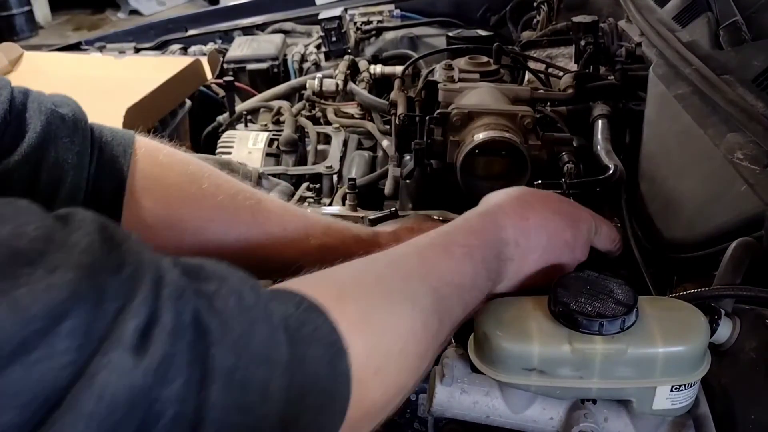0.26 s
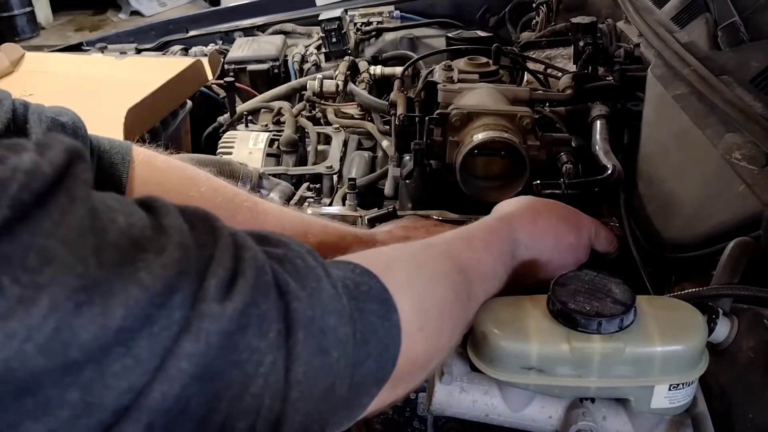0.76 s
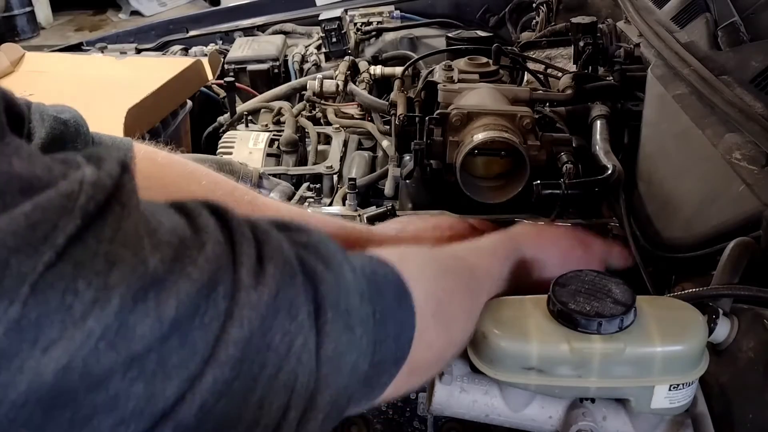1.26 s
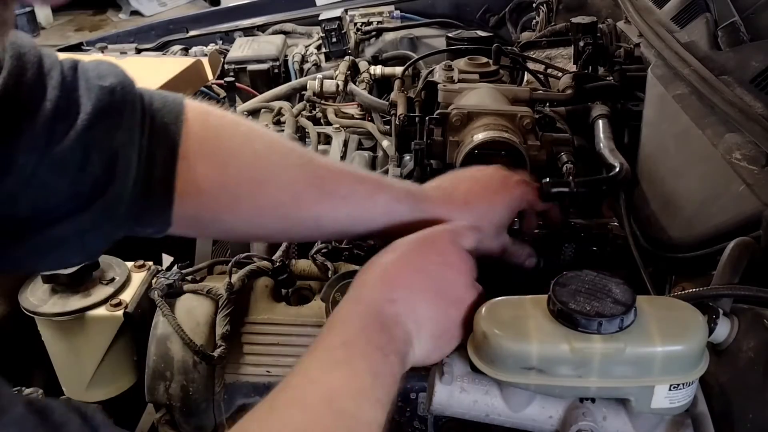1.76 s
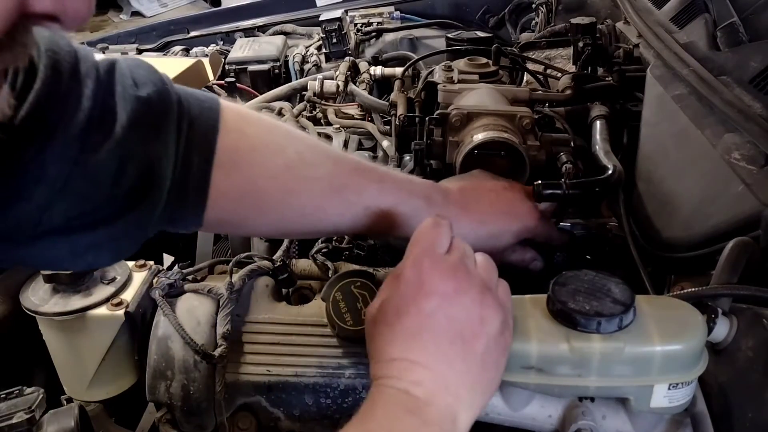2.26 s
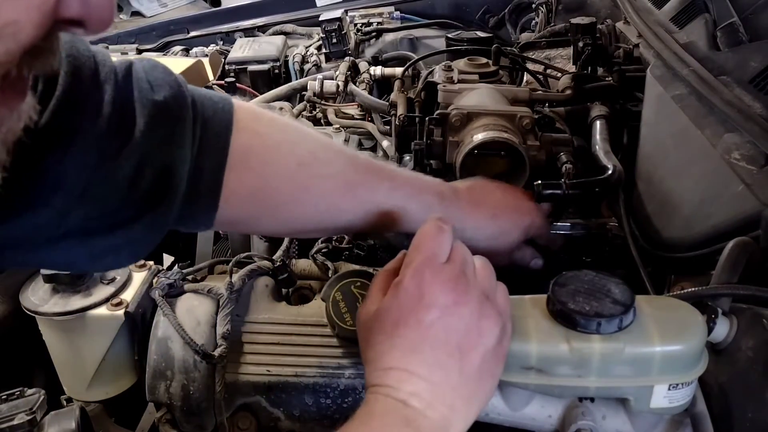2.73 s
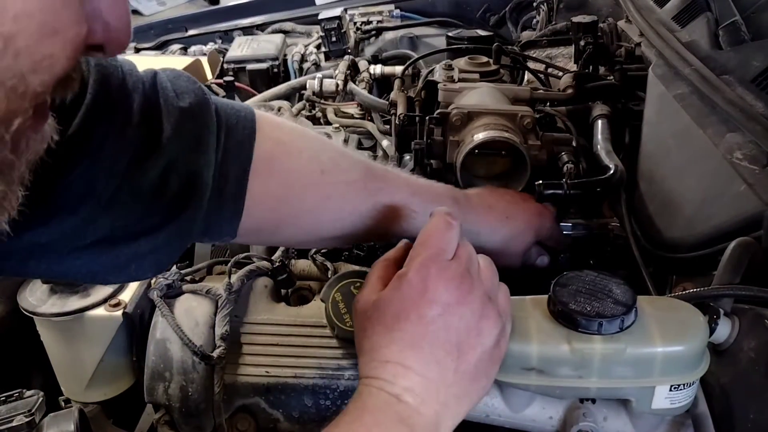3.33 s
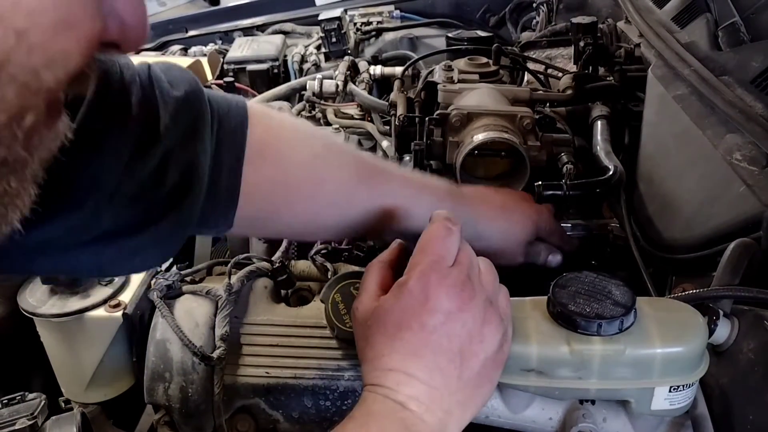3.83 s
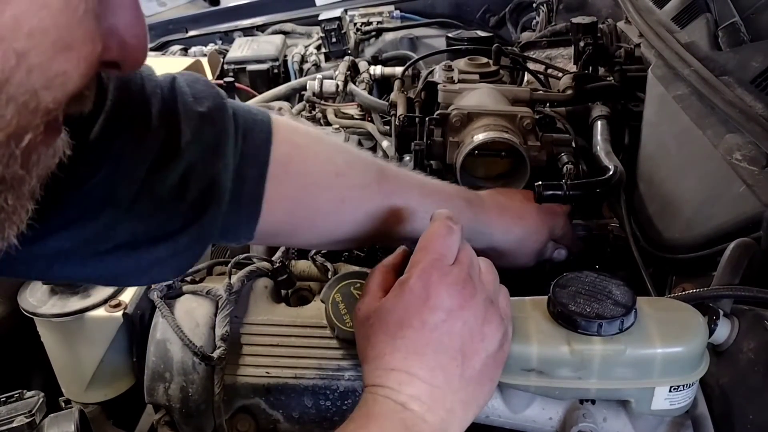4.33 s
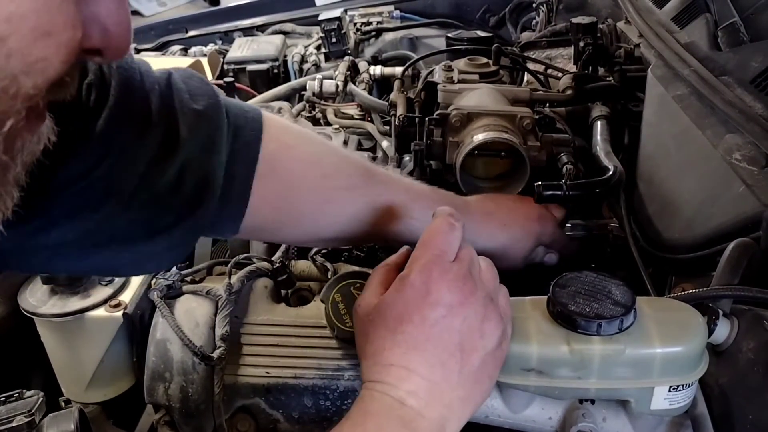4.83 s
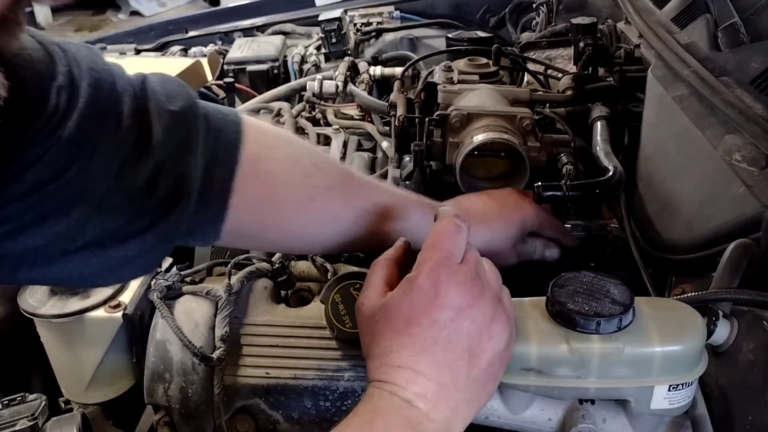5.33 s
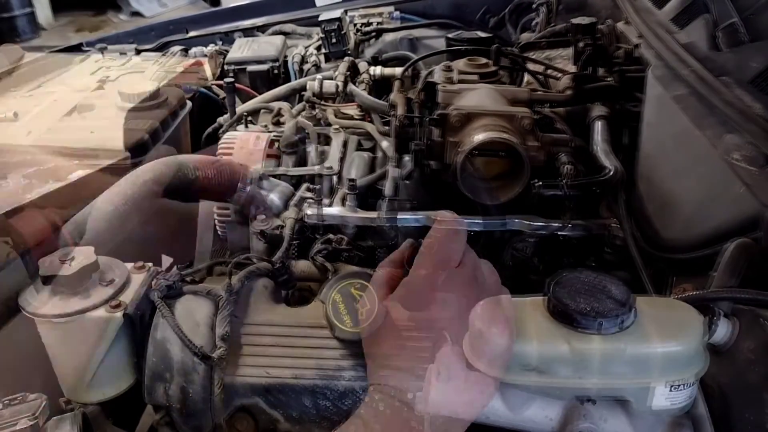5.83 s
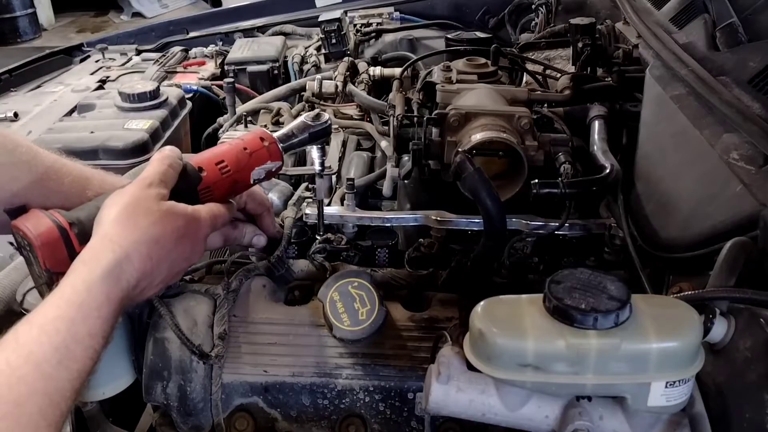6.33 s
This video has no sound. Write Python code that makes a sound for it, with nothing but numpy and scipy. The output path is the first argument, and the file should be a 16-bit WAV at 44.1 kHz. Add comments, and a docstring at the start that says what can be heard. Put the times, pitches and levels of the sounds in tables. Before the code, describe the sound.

Hollow knocks, dry clunks and small steel ticks of a socket being fitted in an engine bay, then a cordless ratchet chattering loudly close by.

```python
"""In a garage, under the bonnet of a car, a socket on a long extension is wiggled onto a bolt.
Noise bursts and damped modes make hollow knocks, dry clunks and steel ticks; filtered noise makes
squeaks, rubbing and a sliding hiss. Then a cordless ratchet runs close by: each stroke drags the pawl
over the teeth and snaps back, starting fast, sagging, surging as the load lets go, then slowing down.
The engine bay and the garage answer; a vehicle, a wavering sine, drones far away outside."""
import sys
import numpy as np
from scipy import signal
from scipy.fft import rfft, irfft, next_fast_len
from scipy.io import wavfile
from scipy.ndimage import uniform_filter1d

SR = 44100
rng = np.random.default_rng(int(sys.argv[2]) if len(sys.argv) > 2 else 0)


def master(y):
    """Save y as 16-bit WAV."""
    cut = np.clip(np.atleast_2d(y).T, -1, 1)
    pcm = np.round(cut * 32767)  # scale
    wavfile.write(sys.argv[1], SR, pcm.astype(np.int16))


N = 290178
TIME = np.arange(N) / SR  # seconds


def undb(db):
    """Decibels to gain."""
    return 10 ** (np.asarray(db) / 20)


def unit(x):
    """Scale to an rms of one."""
    return x / np.sqrt(np.mean(x ** 2))


def curve(rows, axis=1):
    """One column of a table, joined by straight lines in time."""
    rows = np.array(rows)
    return np.interp(TIME, rows[:, 0], rows[:, axis])


def fade(t60, size):
    """Exponential decay by 60 dB in t60 seconds."""
    return np.exp(-np.log(1000) * TIME[:size] / t60)


def swell(s, length_s):
    """A smooth rise and fall around one moment; length_s runs from the peak to 1/e."""
    return np.exp(-((TIME - s) / length_s) ** 2)


def wander(size):
    """Smooth chance that changes over some samples; spread of one."""
    once = uniform_filter1d(rng.standard_normal(N), size)
    return unit(uniform_filter1d(once, size))


def through(x, response):
    """Pass a sound through an impulse response."""
    return signal.fftconvolve(x, response)[:len(x)]


def band(x, lo, hi, order=3):
    """Band-pass filter; its upper edge stays below 0.45 of the sample rate."""
    sos = signal.butter(order, [lo, min(hi, SR * .45)], "band", fs=SR, output="sos")
    return signal.sosfilt(sos, x)


def colour(x, points, tilt_db=0, size=2048):
    """Causal minimum-phase filter with a (Hz, dB) spectrum, tilted by some dB per octave."""
    hz, db = np.transpose(points)
    octave = np.log2(np.maximum(np.fft.rfftfreq(size, 1 / SR), 1))
    tilted_db = db + tilt_db * np.log2(hz / hz[0])
    gain = undb(np.interp(octave, np.log2(hz), tilted_db))
    # folding the cepstrum makes the response start at once
    cepstrum = irfft(np.log(gain))
    cepstrum[1:size // 2] *= 2
    cepstrum[size // 2 + 1:] = 0
    return through(x, irfft(np.exp(rfft(cepstrum))))


def ring(modes, tilt_db=0, scatter_db=1, detune=0.02, size=16384):
    """Sum of damped modes; their balance and tuning change a little with the spot that is struck."""
    total = np.zeros(size)
    for hz, db, t60 in modes:
        gain = undb(db + tilt_db * np.log2(hz) + scatter_db * rng.standard_normal())
        pitch = hz * (1 + detune * rng.standard_normal())
        total += gain * fade(t60, size) * np.sin(2 * np.pi * pitch * TIME[:size])
    return total


def resonate(x, hz, t60):
    """Drive one mode with a force; the result has an rms of one."""
    r = np.exp(-np.log(1000) / (t60 * SR))
    return unit(signal.lfilter([1, 0, -1], [1, -2 * r * np.cos(2 * np.pi * hz / SR), r * r], x))


def burst(t60, size=16384):
    """Noise that dies away, of unit energy."""
    x = rng.standard_normal(size) * fade(t60, size)
    return x / np.linalg.norm(x)


# Stereo width. Each row: frequency in Hz, side level minus mid level in dB.
STEREO_WIDTH = [(60, -10.5), (380, -11), (560, -6), (760, -0.5), (1200, 1), (2400, -0.5), (4400, 1),
                (8100, 2), (15000, 3)]


def stereo(mid, side):
    """Left and right are more alike in the bass and mostly unrelated in the treble."""
    side = colour(side, STEREO_WIDTH)
    return np.array([mid + side, mid - side])


def hiss(points):
    """Stereo noise with a (Hz, dB) spectrum."""
    return stereo(*(unit(colour(x, points, size=8192)) for x in rng.standard_normal((2, N))))


def add(out, s, x, db, size=128, bay_t60=0.022):
    """Mix in an event at its peak level; reflections among the engine parts set the channels apart."""
    start = max(int(s * SR), 0)
    # the peak is the loudest short-term rms over size samples
    x = x * undb(db) / np.sqrt(uniform_filter1d(x ** 2, size).max())
    reflections = through(x, burst(bay_t60))
    out[:, start:start + len(x)] += stereo(x, reflections)[:, :N - start]


# Far vehicle. Each row: time in seconds, mean firing rate in Hz, mean level in dB.
VEHICLE_DRONE = [(0, 79.3, -86), (1.5, 66, -76), (2.1, 65.5, -65), (2.6, 68.5, -67), (3.0, 72.5, -64.5),
                 (3.5, 72.6, -56.5), (3.7, 72.2, -80), (4.0, 80.1, -84), (4.2, 95.1, -69), (5, 95, -70.5),
                 (5.6, 98.8, -67), (6.58, 99, -61.5)]
# Spectrum of the garage air. Each row: frequency in Hz, level in dB.
AIR_SPECTRUM = [(15, -33.5), (25, -33), (58, -20), (70, -9.5), (96, -8.5), (177, -8.5), (197, -12.5),
                (309, -16), (392, -46), (616, -34), (916, -31), (14000, -43)]


def background(air_db=-70, pitch_wander=0.038, waver_db=1.5):
    """Still garage air as steady noise; a far vehicle's exhaust note as a sine of wavering pitch and level."""
    # the pitch wander is a share of the firing rate
    firing_hz = curve(VEHICLE_DRONE) * (1 + pitch_wander * wander(size=8000))
    turns = np.cumsum(firing_hz) / SR
    note = np.sqrt(2) * np.sin(2 * np.pi * turns)
    drone = note * undb(curve(VEHICLE_DRONE, axis=2)) * undb(waver_db * wander(size=4000))
    return drone + hiss(AIR_SPECTRUM) * undb(air_db)


# Drags of an arm or sleeve. Each row: loudest moment in seconds, level in dB, peak to 1/e in seconds.
ARM_DRAGS = [(0.806, -66.5, 0.43), (2.094, -63.5, 0.62), (3.666, -61, 0.35)]
# Spectrum of skin and cloth. Each row: frequency in Hz, level in dB.
RUSTLE_SPECTRUM = [(25, -39), (70, 10.5), (150, -1.5), (300, -1), (560, 2), (900, -8.5), (1600, -18),
                   (3000, -25.5), (6000, -29), (15000, -43)]


def rubbing(rest_db=-74.5, grip_db=3.0):
    """Skin and cloth drag unevenly over the parts: noise swells above hands that only shift their grip."""
    drags = sum((undb(db) * swell(s, length_s)) ** 2 for s, db, length_s in ARM_DRAGS)
    power = undb(rest_db) ** 2 + drags
    return hiss(RUSTLE_SPECTRUM) * np.sqrt(power) * undb(grip_db * wander(size=900))


# Squeaks on the bolt head. Each row: loudest moment in seconds, peak in dB, peak to 1/e in seconds.
BOLT_SQUEAKS = [(1.433, -70, 0.033), (1.719, -55, 0.0072), (1.734, -53.5, 0.007), (1.76, -72.5, 0.13),
                (2.155, -78, .014), (2.22, -66.5, .016), (2.27, -76.5, .13), (2.359, -72, 0.0096),
                (2.765, -78, .008)]
# Broad scrapes of sliding parts. Each row: loudest moment in seconds, peak in dB,
# peak to 1/e in seconds, centre in Hz.
PART_SCRAPES = [(0.284, -78, .014, 12500), (1.371, -63, 0.01, 7200), (1.552, -72.5, 0.14, 9700),
                (1.727, -70.5, 0.029, 8800), (2.799, -64, 0.0076, 7000), (3.451, -57, 0.014, 4380),
                (3.571, -67.5, 0.074, 4780), (5.457, -73, 0.029, 10670)]
SQUEAK_HZ, SQUEAK_WIDTH_HZ = 5610, 260
SCRAPE_WIDTH = 1  # share of the centre frequency


def squeaks(size=16384):
    """Squeaks share one narrow resonance, scrapes fill a broad band; both are swells of filtered noise."""
    out = np.zeros((2, N))
    middle = size / 2 / SR
    narrow = [(s, db, length_s, SQUEAK_HZ, SQUEAK_WIDTH_HZ) for s, db, length_s in BOLT_SQUEAKS]
    broad = [(s, db, length_s, hz, hz * SCRAPE_WIDTH) for s, db, length_s, hz in PART_SCRAPES]
    for s, db, length_s, hz, width_hz in narrow + broad:
        slide = rng.standard_normal(size) * swell(middle, length_s)[:size]
        add(out, s - middle, band(slide, hz - width_hz / 2, hz + width_hz / 2, order=2), db)
    return out


# Steel touching steel. Each row: start in seconds, reference level in dB, tilt in dB per octave,
# ring in Hz, ring relative to the reference in dB.
STEEL_TICKS = [(0.319, -62.5, -4, 2150, -6), (0.425, -53.5, -3.5, 2260, -9), (1.333, -52, 1.5, 8640, -12),
               (1.346, -47, 3, 6300, -8), (1.554, -31, -7, 2930, -8.5), (2.808, -43, -1, 6500, -9),
               (2.831, -42, 4, 8400, -5), (2.921, -47, 0.5, 1630, 2.5), (2.923, -49, -2, 3230, -2),
               (2.673, -69, -1, 6000, -11), (3.446, -37, -13.5, 5500, -9), (3.805, -67, 4, 5270, -4),
               (3.910, -58.5, 3.5, 4060, -1), (4.537, -69, 1.5, 4560, -13), (4.547, -70, -4, 2400, -5),
               (4.798, -75, -1, 2834, -2), (4.694, -65.5, 4.5, 4120, -11), (5.022, -68.5, 0, 2800, -4),
               (5.367, -65, 2, 5600, -5.5)]
# Spectrum of a tick before its tilt. Each row: frequency in Hz, level in dB.
TICK_SPECTRUM = [(500, -50), (1500, 1), (2600, -6), (3500, -8), (5000, -11.5), (7000, -16.5), (8700, -12),
                 (11000, -18.5), (16000, -25)]
# after each touch the loose socket rattles in a dense run of tiny bounces
RATTLE_DB, RATTLE_T60_S, RATTLE_GRAIN_DB = -12, 0.15, 1
# fingers fidget with the parts all the while
FIDGET_PER_S, FIDGET_DB, FIDGET_SPREAD_DB = 1.6, -78, 2


def ticks(t60=0.03, level_db=-2, ring_t60=0.0072, size=16384):
    """Bright contacts of socket, extension and bolt: noise, brief ring and rattle; faint ones at random."""
    out = np.zeros((2, N))
    for s, db, tilt_db, hz, ring_db in STEEL_TICKS:
        add(out, s, colour(burst(t60), TICK_SPECTRUM, tilt_db), db + level_db)
        add(out, s, resonate(burst(t60), hz, ring_t60), db + ring_db)
        rattle = burst(RATTLE_T60_S) * undb(RATTLE_GRAIN_DB * wander(size=60)[:size])
        add(out, s, colour(rattle, TICK_SPECTRUM, tilt_db), db + RATTLE_DB)
    # one fidget at a random moment of each equal slot
    for slot in np.arange(0, TIME[-1], 1 / FIDGET_PER_S)[:-1]:
        s = slot + rng.random() / FIDGET_PER_S
        db = FIDGET_DB + FIDGET_SPREAD_DB * rng.standard_normal()
        add(out, s, colour(burst(t60), TICK_SPECTRUM), db)
    return out


# Resonances of the sliding extension. Each row: centre in Hz, width in Hz, relative level in dB.
SLIDE_BANDS = [(4650, 860, 10), (6300, 1400, -3), (9550, 770, -5)]


def sliding(from_s=0.375, to_s=0.85, edge_s=0.055, level_db=-80):
    """A soft, steady hiss in a few resonances while the steel extension runs through the fingers."""
    contact = np.clip(np.minimum(TIME - from_s, to_s - TIME) / edge_s, 0, 1)
    friction = rng.standard_normal((2, N))
    rings = 0
    for hz, width_hz, db in SLIDE_BANDS:
        rings = rings + undb(db) * unit(band(friction, hz - width_hz / 2, hz + width_hz / 2, order=1))
    return stereo(*unit(rings)) * contact * undb(level_db)


# Modes of the stiff bracket. Each row: frequency in Hz, level in dB, t60 in seconds.
BRACKET_MODES = [(332, 5, 0.09), (477, -19, 0.05), (582, 8, 0.12), (765, -4.5, 0.096), (905, 0.5, 0.032),
                 (1005, -5, 0.028), (1330, 0, 0.014), (1485, -4, 0.018), (1570, -9, 0.064),
                 (2360, -13, 0.02)]
# Dry clunks. Each row: start in seconds, peak in dB, favoured pitch in Hz,
# fall in dB per octave away from it.
BRACKET_CLUNKS = [(0.422, -50.5, 1496, 7), (3.446, -34, 593, 11), (3.475, -33, 930, 31),
                  (4.692, -47, 1470, 10.5), (4.977, -54.5, 1497, 12)]
# Contact noise of clunks and knocks. Each row: frequency in Hz, level in dB.
CLACK_SPECTRUM = [(150, -18.5), (300, 10.5), (700, 10), (1050, 3.5), (1350, -4.5), (1650, -10.5),
                  (2400, -3.5), (3200, -22.5), (6000, -22), (16000, -48.5)]


def clunks(clack_db=-12, clack_t60=0.21):
    """The extension strikes a stiff bracket: contact noise and damped modes, strongest near one pitch."""
    out = np.zeros((2, N))
    for s, db, favoured_hz, fall_db in BRACKET_CLUNKS:
        # the spot that is struck favours the modes near one pitch
        modes = [(hz, mode_db - fall_db * abs(np.log2(hz / favoured_hz)), t60)
                 for hz, mode_db, t60 in BRACKET_MODES]
        add(out, s, band(ring(modes), 330, 1460, order=2), db, bay_t60=.012)
        add(out, s, colour(burst(clack_t60), CLACK_SPECTRUM), db + clack_db)
    return out


# Modes of the hollow cover before tilt and damping. Each row: frequency in Hz, level in dB, t60 in seconds.
COVER_MODES = [(299, -12, 0.14), (314.8, -10.5, 0.2), (350, -7, 0.055), (420, -13.5, 0.07), (452, -9, 0.06),
               (484.4, 3, 0.05), (529.7, 6.5, 0.068), (560, -1.5, 0.074), (546, -9, 0.023),
               (749, -15.5, 0.13), (930, -10.5, .025), (1131, -12.5, 0.044), (1600, -17, 0.028),
               (2080, -17.5, 0.018)]
# Knocks on it; the row at 2.022 s is a strong wall echo of the 1.986 s knock, played like a knock. # Each row:
# start in seconds, peak of the body in dB, tilt of the modes in dB per octave, # contact relative to that peak
# in dB (before the clack and tap trims), tap pitch in Hz.
COVER_KNOCKS = [(0.451, -54.5, -7, -9, 1240), (1.051, -55, 3, -24, 1110), (1.143, -60, 0, -20, 1050),
                (1.21, -63, 0, -27, 1034), (1.347, -47.5, -8, 2.5, 1040), (1.453, -25, 1.5, -14.5, 1180),
                (1.555, -31.5, -16.5, 2, 1370), (1.567, -29, -18.5, -4.5, 830),
                (1.755, -45.5, -3, -29, 1120), (1.986, -26.5, 1, -24, 1860), (2.022, -35, 0, -19, 1143),
                (2.180, -21, 4.5, -16.5, 1570), (2.591, -35.5, 2.5, -18.5, 1060),
                (2.663, -51.5, -13, -16, 2270), (2.793, -54, 6, 3, 1100), (2.802, -36, -7, -8.5, 805),
                (2.814, -35.5, -12, -8, 1140), (2.829, -39, 4, -22, 1160), (2.938, -40.5, 2, -29, 1700),
                (3.185, -53, -0.5, -11.5, 1690), (3.412, -55.5, -9, -20, 1100)]


def knocks(clack_db=-3, clack_t60=0.066, tap_db=-2, tap_t60=0.0072, tap_width=0.33,
           contact_hz=2300, low_hz=255, push_s=0.0041, hand_t60=1.0):
    """The socket bumps the hollow cover: a noisy clack, a short pitched tap and the cover's modes."""
    out = np.zeros((2, N))
    for s, db, tilt_db, contact_db, hz in COVER_KNOCKS:
        body = ring(COVER_MODES, tilt_db)
        # the push takes a moment to build, and the hand resting on the part damps it
        push = 1 - fade(push_s * np.log(1000), len(body))
        body = body * push * fade(hand_t60, len(body))
        # the blunt contact spares the treble, and the small cover radiates little bass
        add(out, s, band(body, low_hz, contact_hz, order=4), db, size=400)
        add(out, s, colour(burst(clack_t60), CLACK_SPECTRUM), db + contact_db + clack_db)
        tap = band(burst(tap_t60), hz * (1 - tap_width), hz * (1 + tap_width), order=2)
        add(out, s, tap, db + contact_db + tap_db)
    return out


def effort(rate, level_db=-16, spin_up_s=0.18, speed_db_per_octave=1, surge_db=2.5, surge_s=0.069):
    """Gain of the ratchet from its speed: it spins up, grows with speed and surges while it accelerates."""
    spin_up = 1 - np.exp(-TIME[:len(rate)] / spin_up_s)
    speeding_up = uniform_filter1d(np.maximum(np.gradient(rate), 0), int(surge_s * SR))
    speed_db = speed_db_per_octave * np.log2(rate / rate.max())
    return spin_up * undb(level_db + speed_db + surge_db * speeding_up / speeding_up.max())


# The ratchet at two microphone ports. Each row: frequency in Hz, radians by which left leads,
# left minus right in dB.
PORT_RESPONSE = [(620, 0, 0), (1300, 2.4, -3), (1900, 1.7, -1), (2450, 3.1, -4), (2900, 6.3, 0),
                 (3400, 9.2, 1), (4370, 10.5, 6), (4620, 9.4, 4), (4900, 10.7, -7), (5200, 11.6, 2),
                 (5470, 11.4, -4), (5650, 12.4, 0), (7700, 13.2, 4), (8700, 12, -1), (10000, 12.4, 4),
                 (12500, 13.8, 0), (16000, 14.6, 0)]


def ports(x):
    """A nearby source reaches the two ports with a different phase and level at each pitch."""
    hz, lead, balance_db = np.transpose(PORT_RESPONSE)
    size = next_fast_len(len(x) + 2048)
    bins = np.fft.rfftfreq(size, 1 / SR)
    turn = np.exp(.5j * np.interp(bins, hz, lead))
    lean = undb(np.interp(bins, hz, balance_db))
    # the summed power of both channels stays the same at every pitch
    gains = np.array([lean * turn, 1 / turn]) * np.sqrt(2 / (1 + lean ** 2))
    return irfft(rfft(x, size) * gains, size)[:, :len(x)]


# Ratchet speed; the load drags it down, lets go, then drags it down further.
# Each row: time in seconds, strokes per second.
RATCHET_SPEED = [(5.712, 58.2), (5.84, 49.5), (5.97, 35.9), (6.04, 36.0), (6.15, 71.1), (6.33, 59.1),
                 (6.4, 45.0), (6.5, 29), (6.58, 12.5)]
# Impacts in one stroke, three teeth and the duller snap back.
# Each row: share of the stroke, mean force in dB, tilt in dB per octave.
PAWL_IMPACTS = [(.005, 0.5, -1.5), (.13, 2, 1), (0.255, -1, -1.5), (.51, 2.5, -2)]
# Spectrum of the ratchet head. Each row: frequency in Hz, level in dB.
HEAD_SPECTRUM = [(30, -30), (130, -25), (200, -25.5), (550, -19.5), (1000, -11.5), (1300, -8.5), (1900, -5),
                 (3300, -3.5), (4500, 3.5), (5200, 1.5), (6300, -3), (7600, 1), (9000, -1), (10000, 1),
                 (12500, -3.5), (15500, -5)]
# Steel rings of head and socket. Each row: frequency in Hz, relative level in dB, t60 in seconds.
STEEL_RINGS = [(1915, -12, .08), (4371, -3, .06), (4720, -2, .02), (4945, 2, .04), (5085, -1, .04),
               (5475, -3, .06), (5580, -2, .05), (5797, -7, .07), (7227, -5, .06), (7442, -6, .04),
               (7705, -4, .06), (8263, -7, .04), (8677, -6, .08), (9620, 1, .025), (9880, -1, .02),
               (10105, -4, .03)]
# Engine parts shaken by the tool. Each row: frequency in Hz, relative level in dB, t60 in seconds.
ENGINE_MODES = [(285.4, 1, 0.093), (315, -4, 0.3), (327, -4, 0.21), (405.4, -1, 0.13), (419, 0.5, 0.034),
                (516, 1.5, 0.03), (573, 3.5, 0.042), (663, -1.5, 0.16), (715, 1.5, 0.084), (792, -1, 0.21),
                (903, -4, 0.019), (1087, -3.5, 0.049)]
CHATTER_T60_S, CHATTER_GRAIN_DB, UNEVEN_DB = .033, 1.4, .5
LOAD_DB = -17.5  # shaking passed down the extension into the engine, relative to the head


def ratchet(slip=0.00074, steel_t60=0.017, shake_t60=0.0073, steel_db=-6.0, pivot_hz=6000, bay_db=-3.5):
    """Strokes throw the pawl at the teeth: noisy blows clatter, ring the steel and shake the engine parts."""
    start = int(RATCHET_SPEED[0][0] * SR)
    rate = curve(RATCHET_SPEED)[start:]
    turns = np.cumsum(rate) / SR
    share, force_db, tilt_db = np.transpose(PAWL_IMPACTS)
    # chance of each impact: timing (slip is a share of a stroke) and force
    chance = rng.standard_normal((int(turns[-1]) + 1, 2, len(share)))
    strokes = np.arange(len(chance))[:, None]
    at = np.searchsorted(turns, strokes + share + slip * chance[:, 0])
    # the chatter comes in grains of about a millisecond, in all bands at once
    grains = undb(CHATTER_GRAIN_DB * wander(size=32)[start:])

    def force(hz, t60, scatter_db):
        """Loose teeth and socket chatter as fading noise after each blow; slow strokes strike harder."""
        blow_db = force_db + tilt_db * np.log2(hz / pivot_hz) + UNEVEN_DB * chance[:, 1]
        blows = np.zeros(len(rate) + 1)
        blows[at] = undb(blow_db + scatter_db * rng.standard_normal(at.shape))
        energy_decay = fade(t60, size=2)[1] ** 2
        energy = signal.lfilter([1], [1, -energy_decay], blows[:-1] ** 2 / rate)
        # a tooth rides up for an instant before it drops
        energy = np.abs(uniform_filter1d(energy, size=24))
        return np.sqrt(energy) * grains * rng.standard_normal((3, len(rate)))

    # every blow lands a little differently and favours other bands and other rings
    edges = np.linspace(30, 18000, 13)
    chatter = 0
    for lo, hi in zip(edges, edges[1:]):
        blows = force((lo + hi) / 2, CHATTER_T60_S, scatter_db=2.2)
        chatter = chatter + band(blows, lo, hi, order=4)
    clatter = unit(np.array([colour(x, HEAD_SPECTRUM) for x in chatter]))
    steel = unit(sum(undb(db) * resonate(force(hz, steel_t60, scatter_db=0.5), hz, t60)
                     for hz, db, t60 in STEEL_RINGS))
    shake = force(ENGINE_MODES[0][0], shake_t60, scatter_db=1.5)
    # neighbouring modes have opposite signs
    hum = sum((-1) ** k * undb(db) * resonate(shake, hz, t60)
              for k, (hz, db, t60) in enumerate(ENGINE_MODES))
    engine = unit(band(hum, 287, 2000))
    head = unit(clatter + undb(steel_db) * steel)
    direct, *scattered = (head + undb(LOAD_DB) * engine) * effort(rate)
    # the bonnet and the engine parts scatter each blow back from all sides
    out = ports(direct) + undb(bay_db) * stereo(*scattered)
    return np.pad(out, ((0, 0), (start, 0)))


# Echoes from floor, door and walls. Each row: delay in seconds, level in dB, top in Hz.
ROOM_ECHOES = [(.037, -18.5, 2790), (.078, -21, 900), (.124, -22, 830)]


def echoes(x):
    """Far surfaces throw a sound back, duller the further it has gone."""
    out = np.zeros((2, N))
    for s, db, top_hz in ROOM_ECHOES:
        late = np.pad(band(x, 270, top_hz, order=2), ((0, 0), (int(s * SR), 0)))
        out += undb(db) * late[:, :N]
    return out


# Garage tail. Each row: low edge in Hz, high edge in Hz (limited by the filter), t60 in seconds, level in dB.
GARAGE_TAIL = [(175, 656, 0.65, 6), (440, 744, 0.64, 0), (900, 2940, 0.74, 9.5), (2280, 5370, 0.94, 4),
               (5130, 16000, 0.94, -17.5), (8900, 38000, 0.13, -5)]


def garage(x, wet_db, build_s=0.0034, grain_db=1.5, size=44100):
    """Diffuse noise tail that builds up between the walls; the highest treble dies first."""
    build = 1 - np.exp(-(TIME[:size] / build_s) ** 2)
    # single reflections stand out of the tail
    build = build * unit(undb(grain_db * wander(size=110)[:size]))
    tails = sum(undb(db) * fade(t60, size) * band(rng.standard_normal((2, size)), lo, hi)
                for lo, hi, t60, db in GARAGE_TAIL)
    mono = x.mean(axis=0)
    return undb(wet_db) * stereo(*(through(mono, tail * build / np.sqrt(SR / 20)) for tail in tails))


def scene():
    """Handling deep in the engine bay, then the ratchet close by, all answered by the garage."""
    steel, bracket, bumps, tool = ticks(), clunks(), knocks(), ratchet()
    room = echoes(bumps + steel)
    room = room + garage(steel, wet_db=-17.0) + garage(bracket, wet_db=-20.0)
    room = room + garage(bumps, wet_db=-11.5) + garage(tool, wet_db=-12)
    handling = rubbing() + squeaks() + steel + sliding() + bracket + bumps
    return background() + handling + tool + room


def record(dry):
    """Soft saturation rounds the highest peaks, then a steep low-pass cuts the top."""
    rounded = np.tanh(0.87 * dry) / 0.99
    return signal.sosfilt(signal.ellip(10, .2, 80, 16150, fs=SR, output="sos"), rounded)  # edge in Hz


dry = scene()
out = record(dry)
master(out)
```